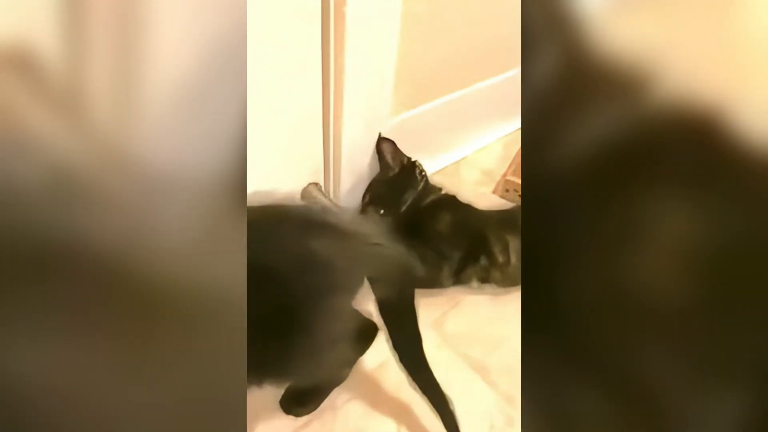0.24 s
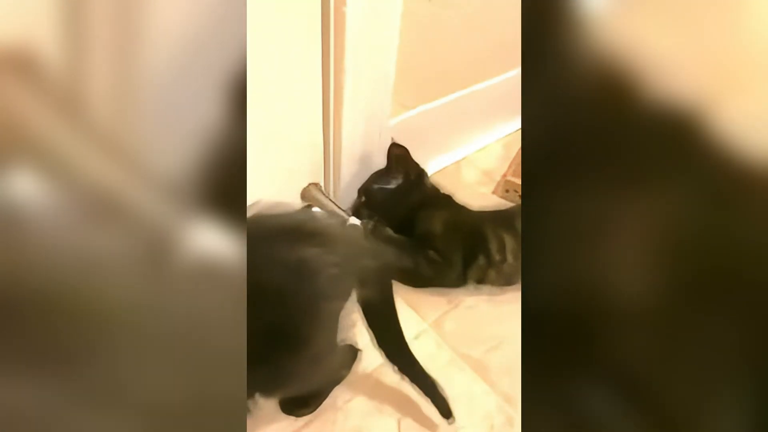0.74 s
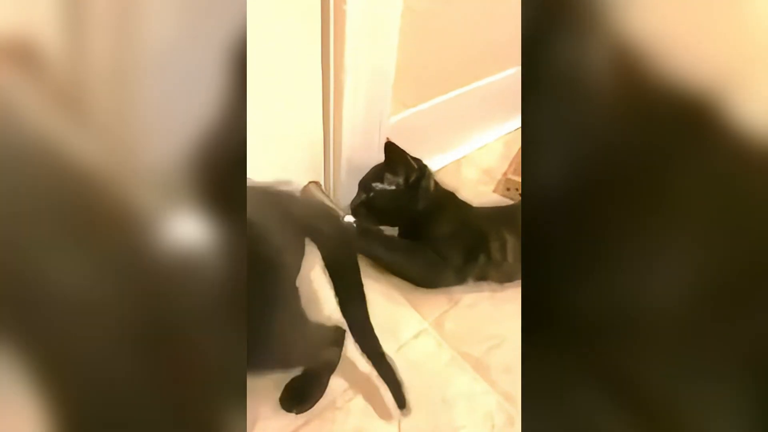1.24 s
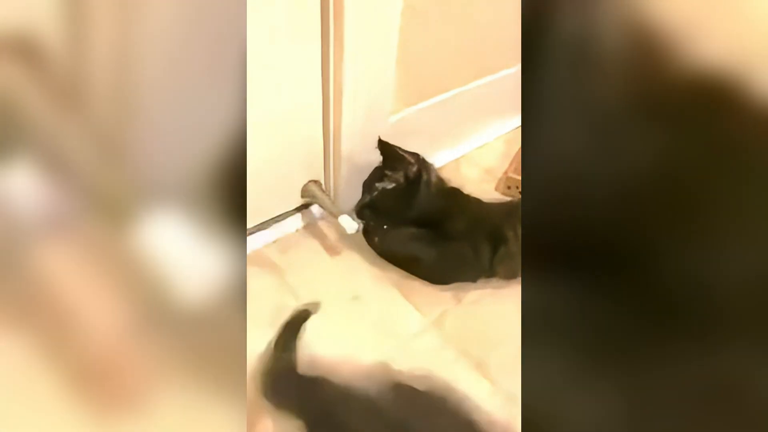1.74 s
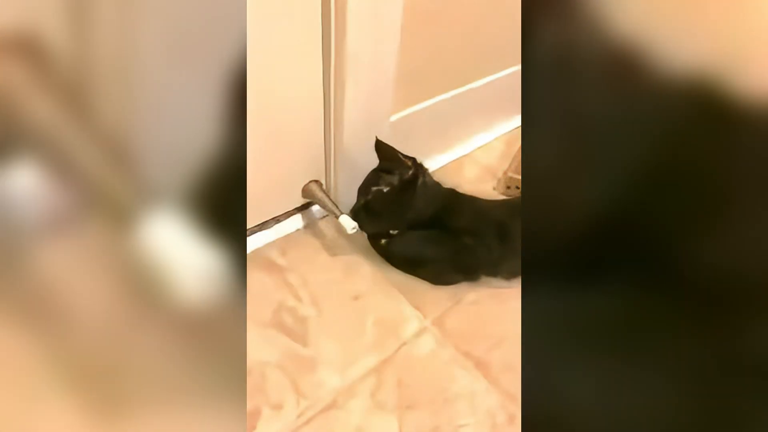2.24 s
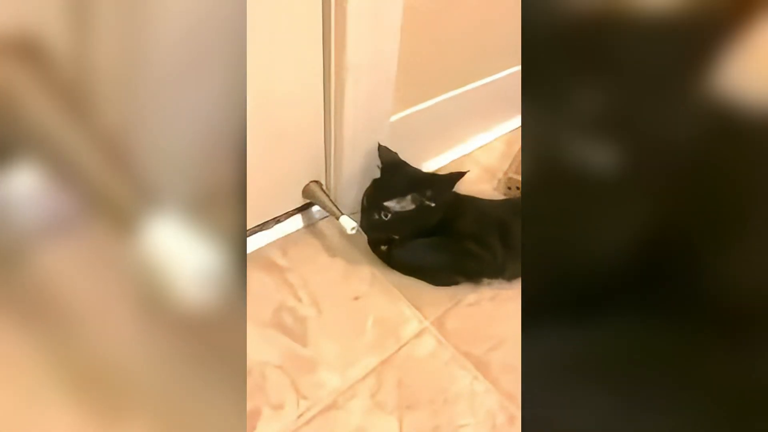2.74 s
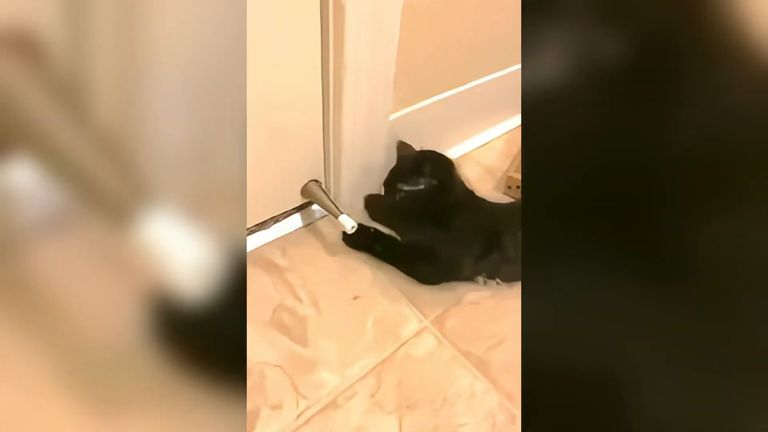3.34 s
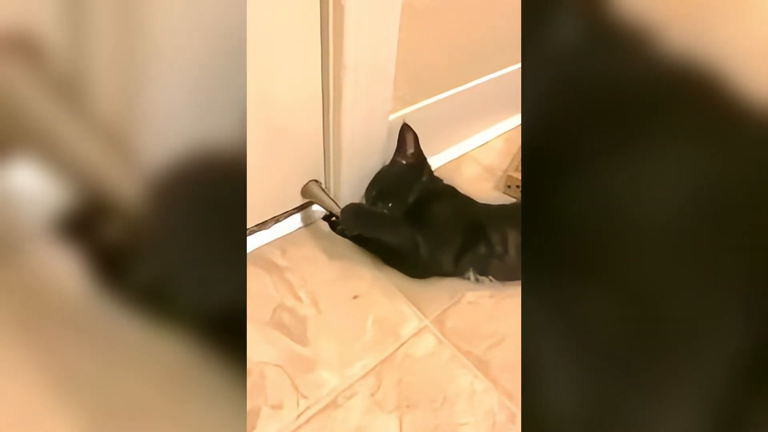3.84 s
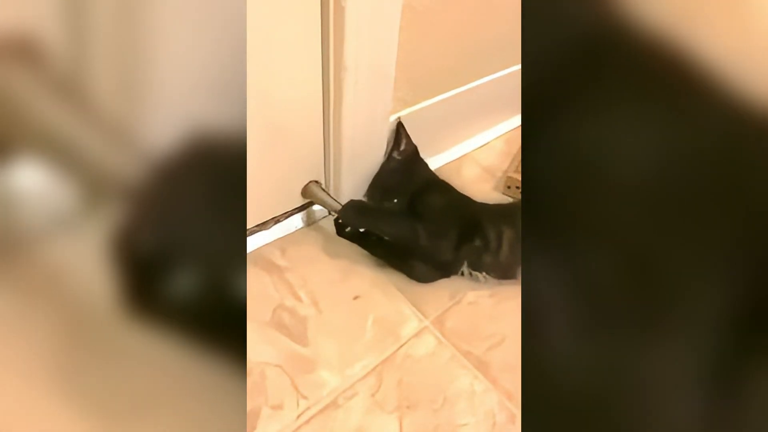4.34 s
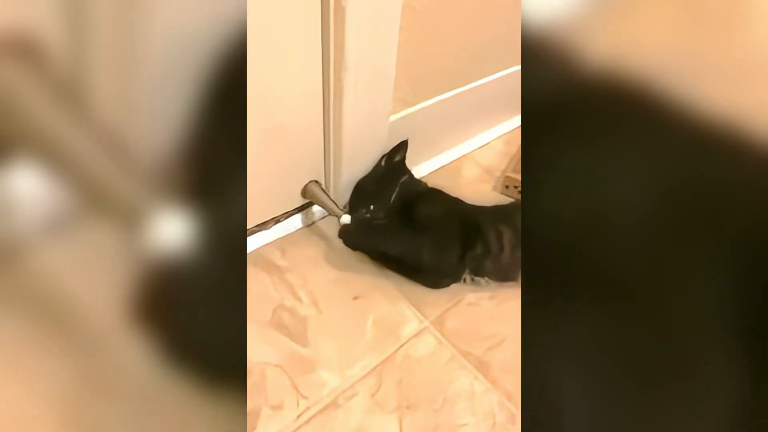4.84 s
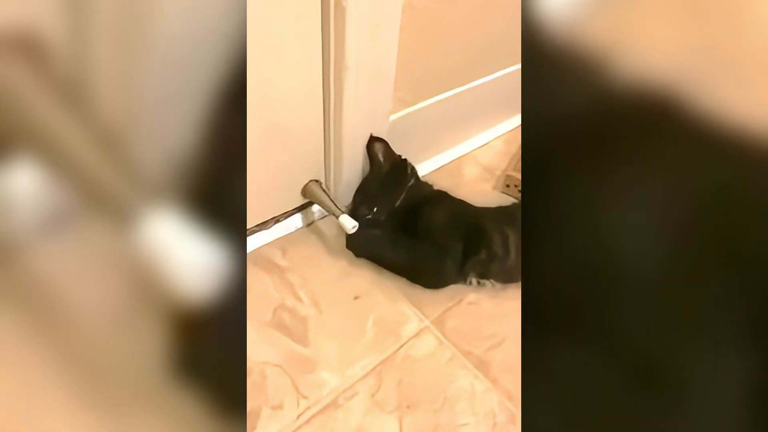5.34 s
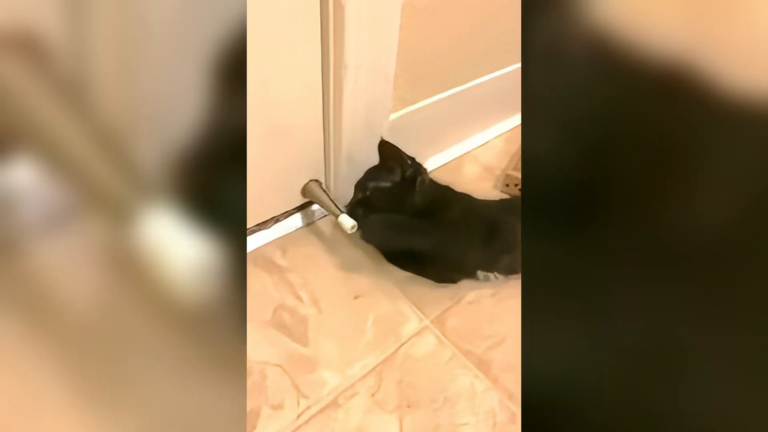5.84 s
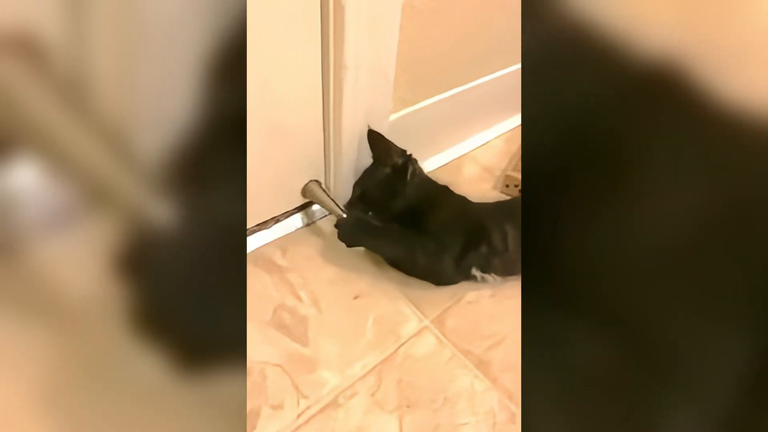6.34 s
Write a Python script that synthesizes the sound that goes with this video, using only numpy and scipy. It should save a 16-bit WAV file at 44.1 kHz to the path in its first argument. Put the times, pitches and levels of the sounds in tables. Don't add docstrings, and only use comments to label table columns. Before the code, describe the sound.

In a small tiled room, a fan drones steadily through a duct. A cat's claws tick a spring door stop softly, then flick it into a rapid fluttering twang of woody knocks and bright coil buzz that dies within half a second. Claws then clack and scrape on tile, a few light touches follow, and two shorter twangs come near the end. Close stereo microphone, short room reverb.

```python
import sys
import numpy as np
from scipy import signal
from scipy.fft import rfft, irfft
from scipy.io import wavfile
from scipy.ndimage import map_coordinates

SR = 44100
rng = np.random.default_rng(int(sys.argv[2]) if len(sys.argv) > 2 else 0)


def amplitude_ratio(level_db):
    exponent = np.asarray(level_db, float) / 20
    return 10 ** exponent


def put_to_file(sound):
    columns = np.atleast_2d(sound).T
    safe = np.clip(columns, -1, 1)
    whole_steps = np.round(safe * 32767)
    wavfile.write(sys.argv[1], SR, whole_steps.astype(np.int16))


N = 291060
HZ = np.maximum(np.fft.rfftfreq(N, 1 / SR), 1)

# pitch in Hz, level in dB, 60 dB decay in seconds.
BOARD_MODES = [(170.1, -3, 0.1155), (294.9, 9.5, 0.0844), (442, -0.5, 0.0182), (473, 13.5, 0.024),
               (589, 13.5, 0.0256), (727, 9, 0.016), (900, -27, 0.058), (1230, 2.5, 0.276),
               (1650, -14.5, 0.021), (2854, 9, 0.0078)]
# frequency in Hz, shared power from 0 to 1, left lead in radians.
ROOM_PORTS = [(60, .99, 0.), (170, .97, -.05), (280, .6, -.5), (350, .42, -.6), (600, .5, -.9),
              (1000, .48, -1.7), (1400, .4, -2.0), (2070, .25, -3.7), (2800, .55, -3.5), (3800, .5, -4.2),
              (4400, .93, -3.5), (4780, .995, -np.pi), (5200, .94, -2.75), (5900, .8, -1.5), (6900, .96, 0),
              (9000, .99, np.pi), (11100, .96, 2 * np.pi), (13150, .99, 3 * np.pi), (15200, .96, 4 * np.pi)]


def rms_one(x):
    return x / np.sqrt(np.mean(x ** 2) + 1e-20)


def at_hz(points):
    hz, value = np.transpose(points)
    return np.interp(np.log(HZ), np.log(hz), value)


def drift(rate):
    steps = rng.standard_normal(int(N / SR * rate) + 3)
    return map_coordinates(steps, [np.arange(N) / SR * rate], order=3)


def bumps(rows, power=1):
    t = np.arange(N) / SR
    gain = 0
    for s, peak_db, rise, fall in rows:
        distance = np.maximum((s - t) / rise, (t - s) / fall)
        gain = gain + amplitude_ratio(peak_db - 20 * distance ** power)
    return gain


def ring(clicks, hz, t60):
    r = amplitude_ratio(-60 / (t60 * SR))
    w = 2 * np.pi * min(hz, 20000) / SR
    return signal.lfilter([0, np.sin(w)], [1, -2 * r * np.cos(w), r * r], clicks + 1e-18)


def clicks_at(rows, heights):
    out = np.zeros(N)
    np.add.at(out, (np.array(rows)[:, 0] * SR).astype(int), heights)
    return out


def grains(per_s, spread_db):
    sizes = amplitude_ratio(spread_db * np.minimum(rng.exponential(1, N), 5))
    signs = rng.choice([-1, 1], (3, N))
    return sizes * signs * (rng.random(N) < per_s / SR)


def ports(shared, own, table, linger):
    hz, share, lead = np.transpose(table)
    share = np.clip(np.interp(HZ, hz, share), .01, .995)
    lead = np.interp(HZ, hz, lead)
    for _ in range(linger):
        lead = lead - .42 * np.sin(2 * lead) * (HZ > 5850)
    turn = np.exp(.5j * lead * np.array([[1], [-1]]))
    return irfft(np.sqrt(share) * shared * turn + np.sqrt(1 - share) * own, N)


def heard(draws, table, linger):
    shared, *own = rfft(draws)
    return ports(shared, np.array(own), table, linger)


def fan():
    order_hz = [59.47, 88.46, 143.27]
    order_db = [-41, -30, -32]
    # peak in seconds, peak in dB, rise and fall in seconds.
    order_swells = [
        [(0.04, -22, .1, 0.069), (1.82, -23, 0.7, 0.31), (3.17, -34.5, .15, 0.072), (5.42, -22.5, 0.53, 0.207),
         (6.14, -24, .2, 0.204), (6.5, -38, 0.089, .1)],
        [(0.92, -15, 0.07, 0.074), (2.4, -16, 0.085, 0.05), (3.98, -19.5, 0.11, 0.061), (4.7, -25.5, 0.034, 1),
         (5.42, -37.5, 0.078, 1), (6.13, -24, 0.18, 0.29)],
        [(0.59, -20.5, 0.098, 0.033), (2.4, -26.5, 0.24, 0.187), (4.02, -23, 0.283, 0.236),
         (4.38, -29, 0.082, 0.7), (5.38, -28.5, 0.325, 0.13), (6.45, -23, 0.068, 0.16)],
    ]
    # centre in Hz, width in Hz, lift in dB.
    duct_modes = [(107.25, 12.3, 5.5), (174.14, 10.6, 7.5), (202.9, 29.7, 3.5), (229.15, 4.7, 6),
                  (286.52, 47.7, 10.5), (537.3, 131.6, 4.5), (612.7, 117.8, 10.5), (870, 6.86, 7.5),
                  (870, 107, 8), (1170, 33, 5.5), (1420, 18, 0)]
    # frequency in Hz, level in dB per Hz.
    air_colour = [(30, -66.5), (55, -55.5), (100, -52), (200, -54), (360, -61), (600, -58.5), (1000, -61.5),
                  (1400, -53), (2000, -64.5), (4000, -72), (5200, -70.5), (7500, -83), (8800, -81),
                  (15500, -102)]

    colour = at_hz(air_colour)
    for hz, width, db in duct_modes:
        colour = colour + db / (1 + (2 * (HZ - hz) / width) ** 2)
    ripple = map_coordinates(rng.standard_normal(2000), [HZ / 24.], order=3) * (HZ > 700)
    shared, *own = rfft(rng.standard_normal((3, N))) * amplitude_ratio(colour + 2.52 * ripple)
    air_db = -23.5 + 0.754 * drift(3.128) + 0.72 * drift(12.0)
    air = amplitude_ratio(air_db) * rms_one(ports(shared, np.array(own), ROOM_PORTS, linger=2))

    tones = 0
    for hz, db, swells in zip(order_hz, order_db, order_swells):
        phase = 2 * np.pi * np.cumsum(hz + 2.568 * drift(9.0)) / SR
        level = amplitude_ratio(db + 4.5 * drift(11.0)) + bumps(swells, power=0.704)
        tones = tones + level * amplitude_ratio(-2.0 + 1.14 * drift(17.0)) * np.sin(phase)
    return air + tones


def pings(rows, trim_db, cycles, snap, rise):
    out = np.zeros((3, N + 2000))
    noise = rng.standard_normal((len(rows), 3, 2000))
    t = np.arange(2000) / SR
    for (s, peak_db, hz), burst in zip(rows, noise):
        decay = np.exp(-np.log(1000) * t * hz / cycles)
        onset = 1 - np.exp(-t * hz / rise)
        band = signal.butter(2, [hz / 1.5, min(hz * 1.5, 17000)], "band", fs=SR, output="sos")
        tone = np.sin(2 * np.pi * hz * t) + snap * rms_one(signal.sosfilt(band, burst))
        out[:, int(s * SR):][:, :2000] += amplitude_ratio(peak_db + trim_db) * decay * onset * tone
    return out[:, :N]


def throb():
    releases = [
        1.4495,
        5.2265,
        6.0545,
    ]
    half_swings = [
        14,
        4,
        2,
    ]
    half_swing_s, tick_lag_s, depth_db = 0.0355, 0.0072, 11.5
    t = np.arange(N) / SR
    dip = 0
    for first, count in zip(releases, half_swings):
        turns = (t - first - tick_lag_s) / half_swing_s
        dip = dip + np.sin(np.pi * np.clip(turns, 0, count)) ** 2
    return amplitude_ratio(-depth_db * dip)


def rattle():
    # frequency in Hz, level in dB per Hz.
    coil_colour = [(3000, 5.5), (5000, 6.5), (7300, 4), (10000, 5), (13000, 1), (15800, -1.5)]
    # peak in seconds, peak in dB, rise and fall in seconds.
    buzzes = [(0.236, -52, 0.036, 0.054), (0.816, -42, 0.024, 0.01), (0.827, -38.5, 0.006, 0.031),
              (1.368, -35.5, 0.0156, 0.0185), (1.381, -43, .006, 0.0163), (1.418, -40, 0.0125, 0.018),
              (1.44, -43.5, 0.0094, .03), (1.453, -40, 0.0098, 0.039), (1.51, -50.5, .015, 0.033),
              (1.5, -46.5, 0.066, 0.5), (1.68, -50, 0.175, 0.18), (3.203, -27.5, 0.00285, 0.0064),
              (3.212, -37, 0.0071, 0.086), (3.772, -39, 0.009, 0.0317), (3.896, -49.5, 0.011, 0.031),
              (3.905, -50, .02, 0.047), (5.18, -49.5, .03, .04), (5.2, -50, 0.0163, 0.019),
              (5.22, -46, 0.014, 0.0196), (5.235, -42.5, .012, 0.033), (5.25, -39, 0.0093, 0.0225),
              (5.296, -43, 0.0214, 0.0265), (5.347, -47, 0.028, 0.0195), (5.362, -45, 0.0143, 0.036),
              (6.043, -41, 0.0147, 0.029), (6.062, -47.5, .015, .04), (6.082, -40.5, 0.0095, 0.0345),
              (6.115, -47, .015, 0.019), (6.138, -52, .015, 0.0183), (6.152, -51, 0.0113, 0.053),
              (6.285, -52, 0.03, 0.052)]
    colour = amplitude_ratio(at_hz(coil_colour)) * (HZ > 2500)
    buzz = irfft(rfft(grains(per_s=6000., spread_db=3.0)) * colour, N)
    return amplitude_ratio(11.5) * bumps(buzzes) * np.sqrt(throb()) * rms_one(buzz)


def scratch():
    # pitch in Hz, level in dB, 60 dB decay in seconds.
    tile_modes = [(650, -2.5, 0.084), (810, 1.5, 0.0468), (1160, 2, 0.0255), (1571.6, 10.5, 0.0161),
                  (1990, 0, 0.042), (2269, 0, 0.0204), (2687, -3, 0.036), (3222, -3, 0.0238),
                  (4077, -3.5, 0.0143)]
    # peak in seconds, peak in dB, rise and fall in seconds.
    strokes = [
        (0.824, -22.5, 0.051, 0.049),
        (1.368, -13, 0.0127, 0.0071),
        (1.448, -21, 0.099, 0.06),
        (2.896, -14, 0.022, 0.092),
        (3.255, -16.5, 0.067, 0.106),
        (3.53, -25, 0.028, 0.08),
        (3.778, -20.5, 0.066, 0.049),
        (5.215, -23, 0.0645, 0.085),
        (6.052, -26.5, 0.028, 0.056),
    ]
    # start in seconds, peak in dB,
    # ring in Hz.
    taps = [(0.8155, -14, 665), (1.3653, -8, 1230), (1.366, -7, 2890), (1.3775, -16, 1230),
            (1.4444, -11.5, 810), (2.171, -16.5, 1170), (2.8943, -3.5, 1946), (2.8955, -11.5, 1993),
            (2.9094, -18, 1490), (2.921, -12.5, 1600), (2.925, -12.5, 609), (2.934, -17.5, 1252),
            (3.238, -12, 1600), (3.2475, -29.5, 728), (3.2614, -11, 2316), (3.2824, -11.5, 1696),
            (3.493, -21, 1160), (3.7314, -19.5, 1420), (3.7713, -30, 1490), (3.772, -14, 3187),
            (3.8094, -26, 738), (4.4358, -18.5, 877), (5.1806, -13, 710), (5.1896, -13, 1475),
            (5.3622, -17.5, 1321), (6.0546, -19, 810), (6.4462, -21.5, 870), (1.4396, -18.5, 2010),
            (1.4536, -19.5, 2970), (1.4885, -13, 701), (1.5585, -20.5, 805), (1.5925, -16.5, 799),
            (1.6635, -19, 788), (1.8055, -19, 801), (2.8985, -8.5, 1990), (5.139, -25.5, 817),
            (6.056, -9.5, 552.8), (5.1785, -17, 900), (5.2995, -16.5, 526.3), (3.255, -14.5, 1093),
            (6.0875, -15.5, 553), (6.2585, -21, 650), (1.38, -16, 2590)]
    drag = 0
    for hz, db, t60 in tile_modes:
        drag = drag + amplitude_ratio(db) * ring(grains(per_s=1500., spread_db=2.0), hz, t60)
    drag = amplitude_ratio(-1.0) * bumps(strokes) * rms_one(drag)
    claws = drag + pings(taps, -7.0, cycles=61.9, snap=0.515, rise=0.415)
    return signal.sosfilt(signal.butter(4, 4200., fs=SR, output="sos"), claws)


def shudder():
    # peak in seconds, peak in dB, rise and fall in seconds.
    shakes = [
        (0.824, -13.5, 0.099, 0.072),
        (1.368, -16, 0.019, 0.175),
        (1.448, -10, 0.068, 0.74),
        (1.6, -27, 0.124, 0.206),
        (2.905, -22, 0.0156, 0.089),
        (5.238, -11, 0.051, 0.084),
        (5.31, -15, 0.114, 0.28),
        (6.052, -9.5, 0.0099, 0.12),
    ]
    out = 0
    for hz, db, t60 in BOARD_MODES:
        if hz < 900:
            out = out + amplitude_ratio(db) * ring(grains(per_s=430.0, spread_db=4.5), hz, 0.89 * t60)
    return amplitude_ratio(-9.0) * bumps(shakes) * throb() * rms_one(out)


def knocks(rows):
    luck = rng.normal(0, 1.5, (len(rows), len(BOARD_MODES), 2))
    s, peak_db, deep_db = np.transpose(rows)
    out = 0
    for k, (hz, level_db, t60) in enumerate(BOARD_MODES):
        weight_db = deep_db + 8 if hz < 400 else 0
        mode_db = peak_db + level_db - 12.0 + weight_db
        push = np.array([clicks_at(rows, amplitude_ratio(mode_db + own)) for own in luck[:, k].T])
        push = push + 0.64 * np.roll(push, int(0.002037 * SR), axis=1)
        out = out + (-1) ** k * ring(push, hz, t60)
    soft = np.exp(-2 * np.pi * 422.0 / SR)
    return signal.lfilter([1 - soft], [1, -soft], out)


def room(spectrum):
    t60_s, dull_hz = 0.196, 8100
    out = []
    for lags in rng.uniform(.011, .033, (2, 8)):
        total = 0
        for d in lags:
            loop = amplitude_ratio(-60 * d / t60_s) / (1 + 1j * HZ / dull_hz) * np.exp(-2j * np.pi * HZ * d)
            total = total + loop / (1 - loop)
        out.append(spectrum * total / np.sqrt(len(lags)))
    return out


def scene():
    # start in seconds, peak in
    # dB, ring in Hz.
    ticks = [(0.2318, -23, 11500), (0.8154, -24.5, 14700), (0.825, -19, 11250), (1.3653, -10.5, 7350),
             (1.381, -26.5, 7000), (1.4183, -17.5, 11600), (1.4376, -24, 7700), (1.614, -25.5, 7320),
             (1.7644, -22, 14300), (3.2014, -12, 9810), (3.202, -15, 13900), (3.2052, -14, 5965),
             (3.5977, -30.5, 15200), (3.7706, -39, 9000), (3.772, -13.5, 6310), (2.894, -26, 6240),
             (3.894, -22.5, 6340), (3.904, -33.5, 15200), (5.1756, -35.5, 6680),
             (5.2006, -29.5, 6990), (5.218, -27, 10000), (5.2484, -31, 7120), (5.2939, -33, 7240),
             (5.3448, -30, 7000), (6.0416, -25.5, 6200), (6.0614, -14.5, 12300), (6.0794, -23, 6940),
             (6.1144, -34, 7200), (6.1514, -36, 6980), (6.2831, -30, 6760),
             (1.381, -23, 12000), (1.448, -27, 7200), (1.4536, -16, 15000), (1.4545, -29.5, 7000),
                   (1.4905, -28.5, 6710), (1.4905, -12.5, 14500), (1.509, -20.5, 6900), (1.526, -19, 15400),
                   (1.5604, -19.5, 7300), (1.5604, -21, 11170), (1.5968, -20, 14000), (1.5968, -18, 10900),
                   (1.6312, -15.5, 15000), (1.6312, -24.5, 9480), (1.646, -23.5, 14140),
                   (1.6671, -29, 13200), (1.684, -28.5, 7300), (1.717, -29, 13800), (1.731, -32.5, 7000),
                   (1.8317, -38.5, 14500), (5.178, -20.5, 13900), (5.2006, -29.5, 12000),
                   (5.233, -28.5, 6410), (5.2335, -22, 9000), (5.2345, -16, 14000), (5.271, -24, 7000),
                   (5.2945, -27.5, 15000), (5.346, -24, 12000), (6.1366, -30, 6750), (1.4135, -25, 13000),
                   (1.4183, -23.5, 6500), (1.4396, -24.5, 10500), (1.51, -27, 12000), (1.6138, -25, 9970),
                   (5.2484, -30, 12000), (5.3605, -29.5, 9000), (5.4316, -34, 10400), (0.8263, -26, 7000),
                   (6.0794, -24.5, 13000), (6.0855, -23.5, 7000), (6.1366, -30, 12500),
                   (6.2831, -26.5, 11960), (6.2831, -33.5, 14900)]
    # start in seconds, peak in dB, deep modes in dB.
    pushes = [(0.827, -13.5, -16.5), (1.366, -8.5, -5), (1.384, -22, 3.5), (1.414, -9.5, -1),
              (1.513, -10, -7.5), (5.205, -11, -18), (5.238, -8.5, -12.5), (5.139, -22, -28),
              (6.045, -28, -6), (6.087, -8, -8.5), (6.258, -15.5, -31), (6.294, -20.5, -21.5)]
    swing_knocks = [(1.432, -19, -16), (1.451, -10.5, -4.5), (1.468, -19, -3), (1.484, -9, -10.5),
                    (1.524, -11.5, -16.5), (1.558, -13.5, -12.5), (1.592, -7, -6.5), (1.626, -14, -14),
                    (1.662, -11, -16.5), (1.7, -29, -24), (1.733, -10.5, -9.5), (1.769, -14, -25.5),
                    (1.805, -13, -8.5), (1.839, -15.5, -10.5), (1.86, -19, -30), (1.878, -17, -22),
                    (5.227, -7.5, -11), (5.257, -14.5, -24), (5.307, -22.5, -5.5), (5.296, -15.5, -9),
                    (5.369, -16.5, -30.5), (5.385, -26, -28.5), (5.439, -16, -25.5), (6.055, -4.5, -9),
                    (6.064, -29.5, -19.5), (6.123, -25, -24), (6.156, -19.5, -27.5)]
    # Hz, shared power from 0 to 1, left lead in radians.
    near_ports = [(60, .98, 0.), (170, .93, 0.), (350, .5, 0.), (700, .45, .1), (1400, .45, .2),
                  (2070, .45, .8), (2760, .45, 1.4), (3450, .45, 1.7), (4100, .5, 2.5), (4780, .6, np.pi),
                  (5500, .35, 3.9), (6900, .5, 2 * np.pi), (9000, .4, 3 * np.pi), (11100, .45, 4 * np.pi),
                  (13150, .5, 5 * np.pi), (15200, .6, 6 * np.pi)]
    tile_span = [2.8, 3.45]

    board = knocks(pushes + swing_knocks)
    coils = pings(ticks, -1.56, cycles=64.7, snap=0.965, rise=4.06) + rattle()
    body = shudder() + scratch()
    into_room = 0.897 * board[0] + body[0] + 1.12 * coils[0]
    tails = irfft(room(rfft(into_room)), N)
    wet = amplitude_ratio(-2.5) * tails[[0, 0, 1]]
    draws = coils + body
    on_tile = np.abs(np.arange(N) / SR - np.mean(tile_span)) < np.ptp(tile_span) / 2
    far = heard(draws * on_tile + wet, ROOM_PORTS, linger=2)
    near = heard(draws * ~on_tile, near_ports, linger=0)
    return (board + far + near + fan()) * amplitude_ratio(np.array([[.3], [-.3]]))


def low_pass(x):
    return signal.sosfilt(signal.butter(12, 16610, fs=SR, output="sos"), x)


def record(dry):
    band_ends = [42, 15950]
    low_cut = signal.butter(2, band_ends[0], "high", fs=SR, output="sos")
    high_cut = signal.ellip(10, .5, 70, band_ends[1], fs=SR, output="sos")
    rounded = 0.9682 * np.tanh(dry / 0.8297)
    mix = signal.sosfilt(np.vstack([low_cut, high_cut]), rounded)
    return low_pass(mix)


dry = scene()
out = record(dry)
put_to_file(out)
```